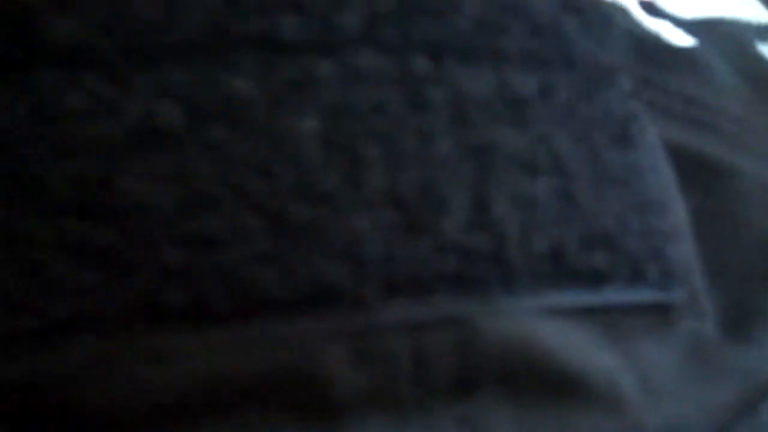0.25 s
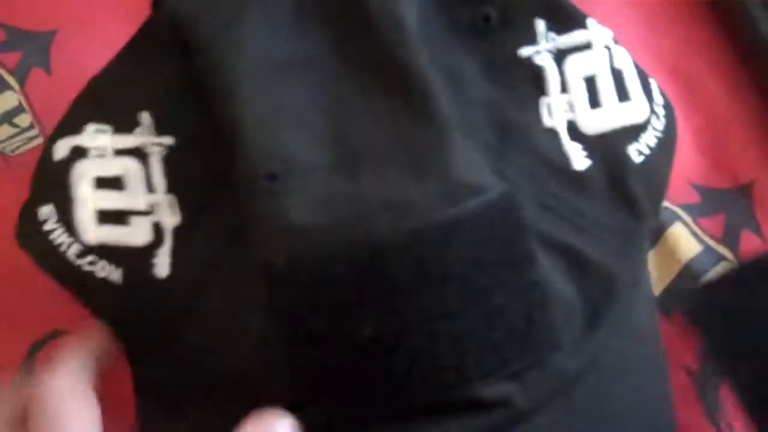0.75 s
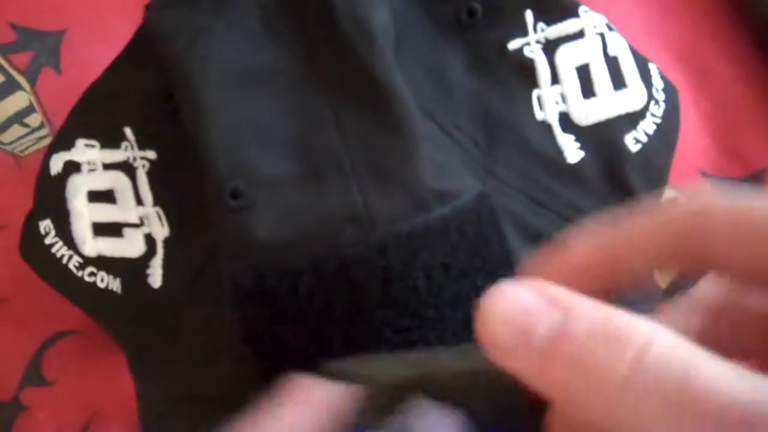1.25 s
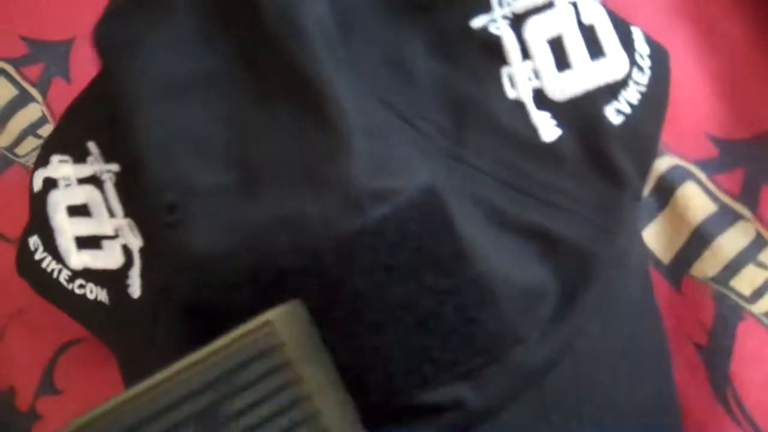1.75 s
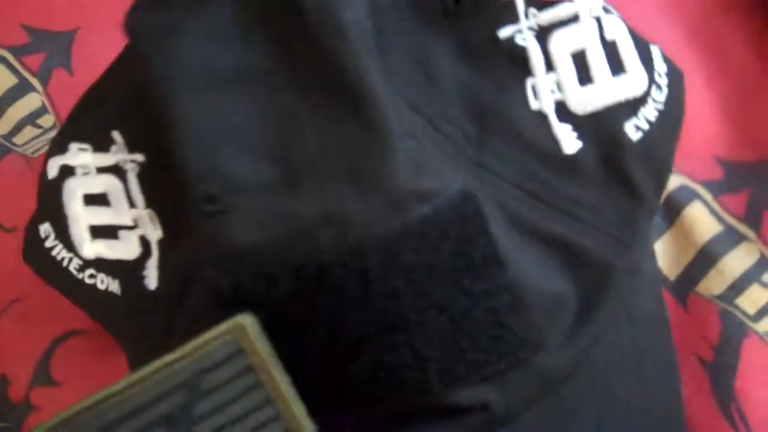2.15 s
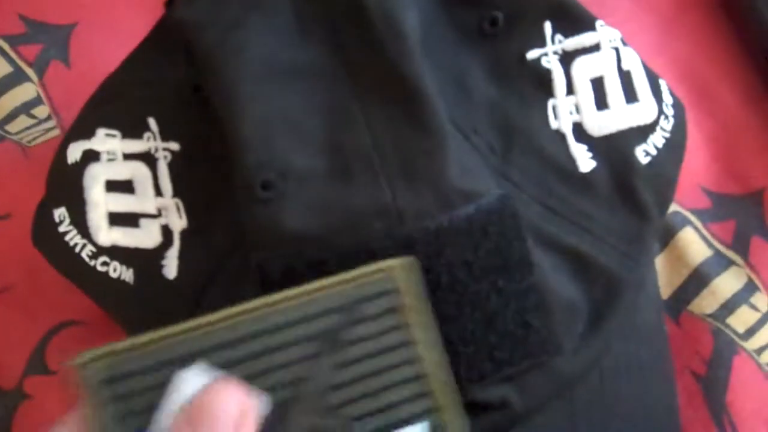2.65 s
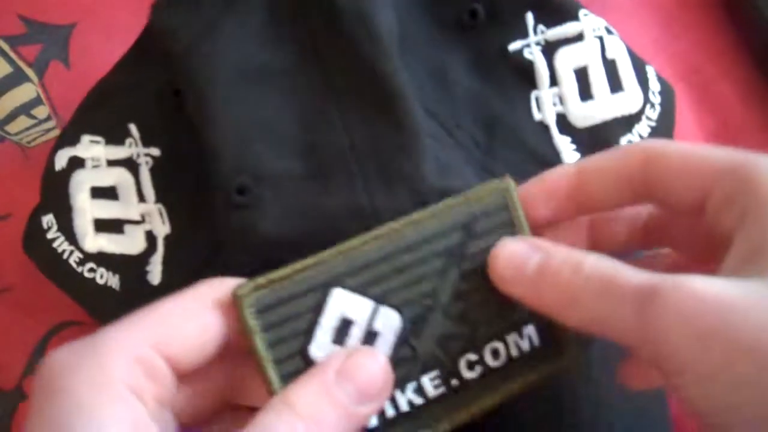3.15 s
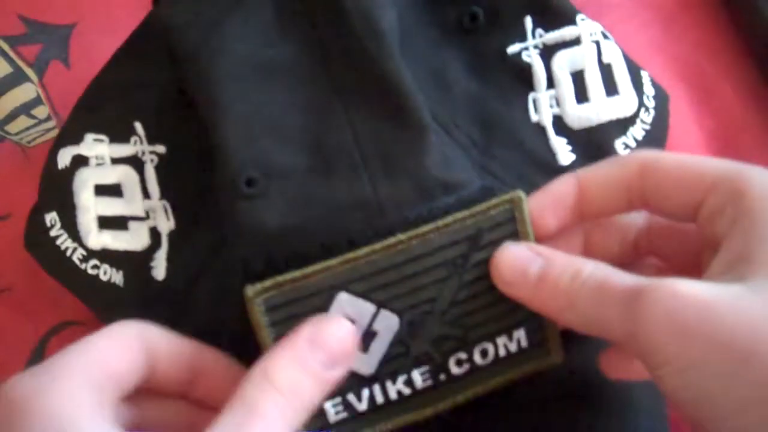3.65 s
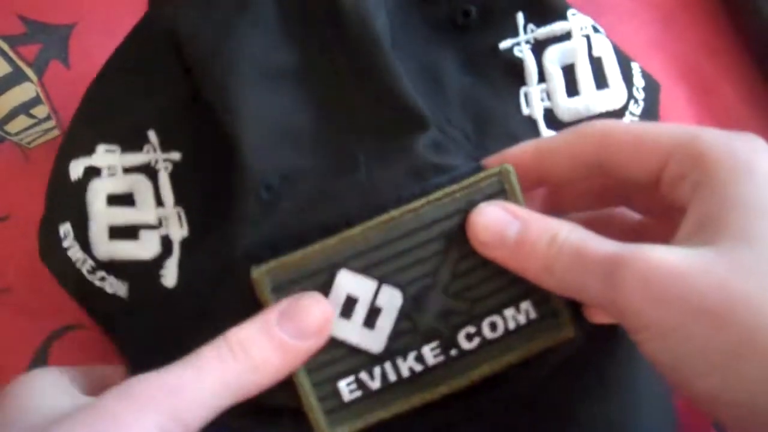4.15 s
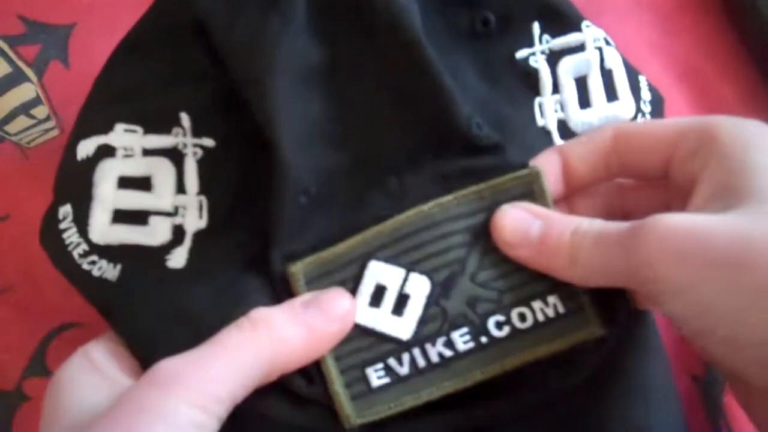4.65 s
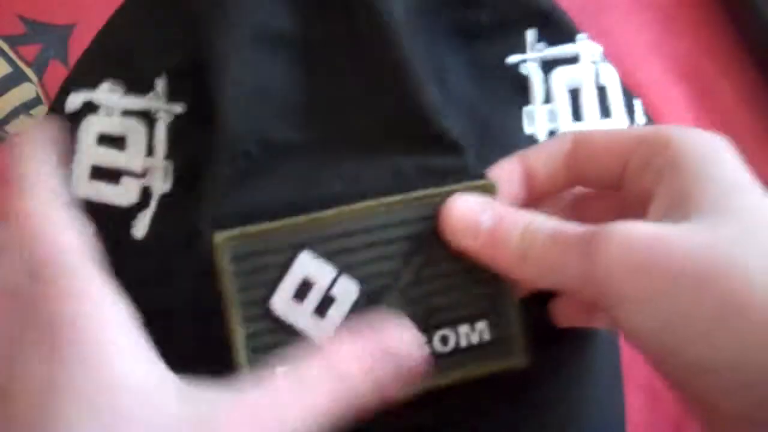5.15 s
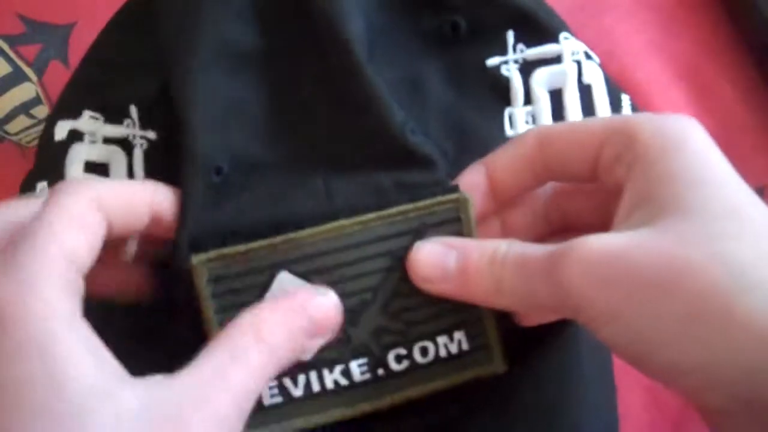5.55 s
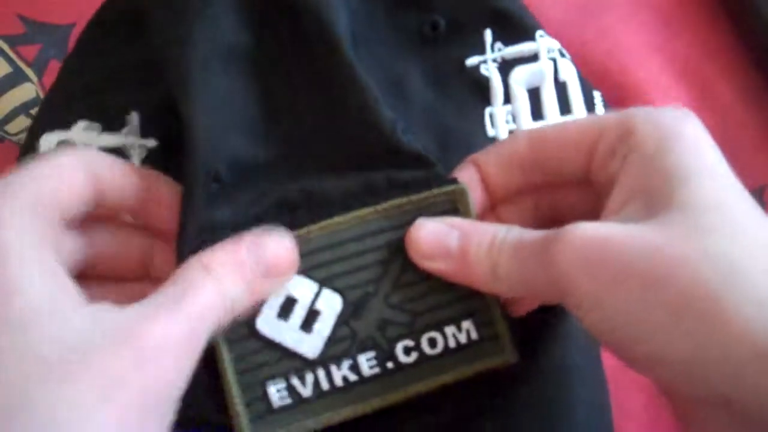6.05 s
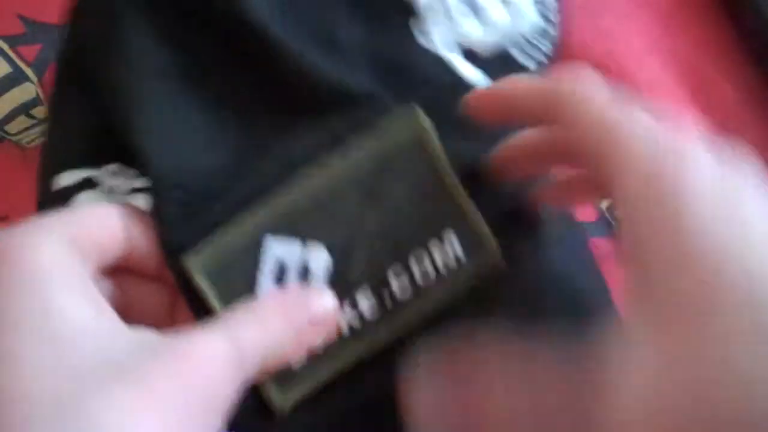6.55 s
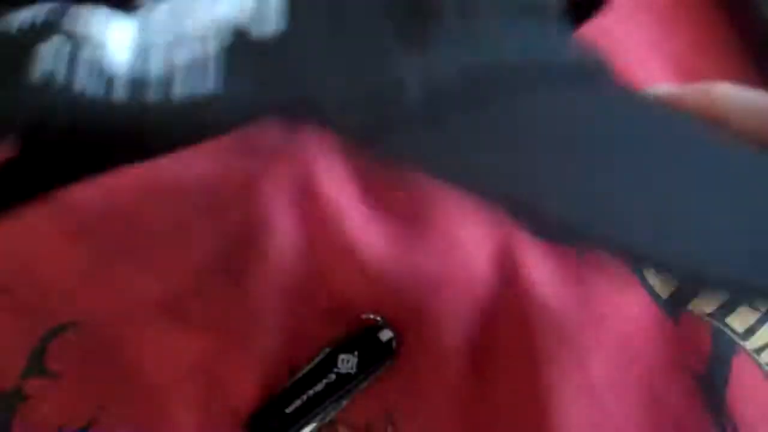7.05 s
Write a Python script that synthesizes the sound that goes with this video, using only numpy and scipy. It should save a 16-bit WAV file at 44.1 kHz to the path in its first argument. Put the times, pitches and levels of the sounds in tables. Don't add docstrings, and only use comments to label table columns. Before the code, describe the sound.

Fingers rub and scuff a fabric cap, a sharp knock early on, then hook-and-loop crackles and snaps thicken as a stiff patch is pressed on.

```python
import sys
import numpy as np
from scipy import signal
from scipy.fft import rfft, irfft, next_fast_len
from scipy.io import wavfile
from scipy.ndimage import uniform_filter1d, map_coordinates

SR = 44100
rng = np.random.default_rng(int(sys.argv[2]) if len(sys.argv) > 2 else 0)


def file_out(sig):
    cols = np.atleast_2d(sig).T
    lim = np.clip(cols, -1, 1)
    pcm = np.round(lim * 32767).astype(np.int16)
    wavfile.write(sys.argv[1], SR, pcm)


def amplitude_ratio(level_db):
    exponent = np.asarray(level_db, float) / 20
    return 10 ** exponent


N = 321533

# f/Hz, level/dB
ROOM_COLOUR = [(20, 5), (60, -2.5), (250, -3.5), (1000, -6), (3000, -7), (6000, -15), (14000, -46)]
# f/Hz, level/dB
HISS_COLOUR = [(100, 9.5), (1000, 6), (5000, 3.5), (14000, 22.5)]
# f/Hz, width/Hz
PORTS = [(7572, 1128), (6300, 954)]
# f/Hz, level/dB
HOUSING = [
    [(100, 1.26), (1000, 2.5), (5000, -3), (9000, -6.5), (14000, -10.5)],
    [(100, -1.5), (1000, 0.35), (5000, -6), (9000, -10.5), (14000, -22)],
]
TOP_HZ, CLICK_TOP_HZ = 14200, 15900

# t/s, level/dB, speed/0-1
SLEEVE = [
    (.15, -81, 0),
    (.25, -56, .4),
    (.34, -53, 0.72),
    (.44, -46.5, 0.75),
    (.5, -61.5, 0.16),
    (.535, -46, 0.04),
    (.6, -80.5, 0.12),
]
# t/s, length/s, level/dB, body re bright/dB
DRAGS = [(0.657, 0.017, -44.5, -3), (0.7, 0.0125, -39.5, -4), (0.743, 0.007, -50, -20),
         (0.796, 0.058, -47, -4), (1.141, 0.05, -71, 4), (1.195, 0.018, -51, -20), (1.214, 0.008, -45, -30),
         (1.294, 0.008, -39, -12), (1.342, 0.039, -52, -25), (1.402, 0.075, -56, -22),
         (1.477, 0.038, -59, -15), (1.537, 0.037, -47.5, -28), (1.574, 0.014, -55, -20),
         (1.613, 0.0054, -45, -25), (1.617, 0.0075, -38.5, -22), (2.254, 0.003, -56, -25),
         (2.264, 0.006, -52, -12), (2.558, 0.028, -52.5, -20), (2.558, 0.15, -60, -11),
         (2.708, 0.006, -52, -15), (3.052, 0.009, -47, -9), (3.229, 0.024, -53.5, 5),
         (3.249, 0.019, -48, 0), (6.632, 0.012, -45, -10), (6.909, 0.031, -50.5, 1), (7.133, 0.03, -52, -8)]
# t/s, peak level/dB, f/Hz, decay/cycles
THUMPS = [(0.688, -44, 57.7, 11), (0.728, -42.5, 45.8, 7.2), (0.928, -61.5, 59.2, 8.8),
          (1.199, -66, 53.8, 5.5), (1.893, -37, 98, 3.09), (2.019, -63, 70.9, 5.2), (2.262, -54, 63, 11),
          (2.72, -63, 80.7, 4.3), (4.099, -72, 64.6, 5.8), (0.627, -60, 113, 9.8), (4.237, -66, 125, 7.7),
          (4.291, -61, 111, 7.8), (5.33, -61.5, 95, 6.1), (6.306, -55, 84, 3.06),
          (5.441, -63.5, 110.5, 4.1), (6.959, -53.5, 68.4, 6.1), (7.098, -63.5, 65, 7.8)]
# t/s, peak level/dB,
# f/Hz, half-width/cycles
POPS = [(0.177, -50.5, 500, 0.4), (1.298, -40.5, 1960, 3.2), (1.621, -36.5, 6300, 4.4),
        (3.056, -43, 1100, 0.82), (3.262, -39.5, 3600, 3.6), (0.6604, -30.5, 447, 0.36),
        (0.665, -33, 613, 0.34), (0.701, -31.5, 450, 0.48), (0.708, -32, 199, 0.39),
        (.731, -34.5, 310, 0.49), (0.737, -32.5, 250, 0.33), (0.8723, -22, 787, 0.377),
        (0.8726, -16.5, 5150, 1.57), (0.8728, -25, 2770, 2.46), (1.8931, -41.5, 3340, 3.9),
        (1.8947, -33.5, 5450, 4.1), (2.2627, -45, 3140, 2.5), (2.2628, -39, 1905, 1.49),
        (5.304, -32, 4800, 1.57), (5.2488, -42, 3700, 2), (6.5828, -35.5, 5560, 1.47),
        (1.894, -42, 250, 0.3), (1.892, -35, 1900, 1.15), (2.2632, -39.5, 1178, 1.35),
        (2.723, -50, 500, 0.8), (3.077, -39, 287, 0.414), (3.831, -51, 395, 1.2), (3.912, -41.5, 473, 0.41),
        (3.947, -43.5, 328, 0.93), (4.08, -38, 1480, 1.77), (4.409, -35, 313, 0.677),
        (4.609, -53.5, 150, 0.92), (5.351, -59, 450, 0.59), (5.465, -50, 510, 0.45),
        (5.848, -22, 461, 0.618), (6.222, -39.5, 317, 0.79), (6.321, -40, 550, 0.36),
        (6.8265, -30.5, 672, 0.61), (6.915, -28, 494, 0.37)]

# f/Hz, level/dB
CRACK_COLOUR = [(400, -55), (1500, -58.5), (3000, -0.5), (5200, -5), (6300, 2.5), (8000, 0), (10000, -3.5),
                (14500, 8)]
# f/Hz, level/dB
BODY_COLOUR = [(80, -66), (300, -16.5), (700, -12), (1500, -5), (2500, -2.5), (4500, -13.5)]
# t/s, peak level/dB, body re crack/dB, left minus right/dB
EDGE_FLICKS = [(0.1774, -32.5, -6.5, 23), (.5198, -47, -2.5, 23), (0.7039, -18.5, -2, 11.5),
               (0.7368, -25.5, 4, 5), (.871, -23, -10.5, 9.5), (0.872, -4, -18.5, -11.5),
               (.8725, -20.5, -12.5, -4), (.8733, -22, -3.5, -5), (1.275, -28, -15.5, 13.5),
               (1.8914, -42.5, -22, 0), (1.8921, -17, -11, -22), (1.893, -18.5, -14, 10.5),
               (1.8948, -29.5, -8, 0), (2.262, -25.5, -10.5, 2.5), (2.7196, -33, 4, -8),
               (3.47, -38.5, -14.5, 3), (3.511, -26, -3, -18.5), (4.244, -19.5, -11, 5.5),
               (4.2851, -20, -9.5, -1.5), (4.5555, -28.5, -5, 14), (4.931, -27.5, -17, 4.5),
               (5.465, -27.5, -9.5, 15), (4.854, -29.5, -12.5, 6.5), (4.869, -26.5, -4, 2.5),
               (5.01, -18.5, -11.5, -7), (5.846, -20.5, -2.5, 12), (6.097, -35.5, -8, 13.5),
               (6.6172, -24.5, -4.5, -2), (6.7886, -29, -11.5, 1), (6.8264, -29.5, 3.5, 2.5),
               (7.0388, -28.5, 1, 4), (7.1355, -38, 3, 3.5)]
# t/s, peak level/dB, body re crack/dB, left minus right/dB
HANDLING_TICKS = [(0.0347, -31.5, -22, 6.5), (0.0732, -30.5, -27, 11), (0.5527, -30, -11.5, 8),
                  (0.7063, -27, -9.0, 3), (0.7403, -21.5, -19.5, 7), (0.9341, -33.5, -12.5, 4.5),
                  (1.0405, -36, -28, 9), (1.1961, -27, -21, 2.5), (1.215, -27, -33, 6),
                  (1.2182, -30, -32.5, 21.5), (1.442, -35.5, -22, 15.0), (1.4969, -37, -3.5, -2.5),
                  (1.895, -31, -7, -7), (2.185, -38.5, -21.5, -3), (3.2588, -25, -8.5, -10.5),
                  (3.2622, -27.5, -0.5, -9), (3.4942, -36.5, -12.5, 6.0), (3.5311, -24, -11, -15.5),
                  (3.65, -27.5, -25.5, 10), (3.8512, -30, -10.5, -8), (3.822, -30.5, -14.5, 2.5),
                  (4.1684, -30.5, -9.5, 5.5), (4.3273, -28, -9.5, 7), (4.5686, -25, -14, 3),
                  (4.6018, -21.5, -14, -5), (4.614, -27.5, -13, -3.5), (4.6361, -23, -12.5, 7),
                  (4.649, -20, -13, 3), (4.6648, -21, -23.5, 15), (4.7133, -22, -23.5, 3.5),
                  (4.7257, -23, -12.5, 1.5), (4.7389, -32.5, -15, 0.5), (4.7489, -24.0, -8, 6.5),
                  (4.799, -20, -14.5, 1.0), (4.8027, -31.5, -20, -0.0), (4.812, -24.5, -15.5, -0.5),
                  (4.8613, -29.5, -18.5, 16), (4.884, -28.5, -13, -6.0), (4.8965, -26, -19, -1.0),
                  (4.9449, -27.5, -22.5, 3.5), (4.9771, -23, -11.5, 2.5), (4.9942, -18.5, -11.5, 0.5),
                  (5.0019, -18.5, -6, -5.5), (5.0909, -14.5, -17.5, 11.5), (5.1144, -30, -19.5, 7.5),
                  (5.1292, -31.5, -20, 9), (5.1914, -10, -20.5, 0.5), (5.202, -21.5, -9, 2.5),
                  (5.2484, -18, -27, 9.5), (5.2575, -26.5, -14.5, -0.5), (5.2612, -35.5, -15, 10.0)]
# t/s, peak level/dB, body re crack/dB, left minus right/dB
PRESSING_RIPS = [(5.2749, -24.5, -13.5, 4.5), (5.3029, -15, -18, 9), (5.4686, -31.5, -1, 6.5),
                 (5.6481, -29.5, -20.5, -8.5), (5.6995, -25, -26, 8.5), (5.7722, -31, -11.5, -5.5),
                 (5.8236, -20.5, -20.5, 1.5), (5.8516, -20.5, -2.5, 5.0), (5.8952, -17.5, -29, 11),
                 (5.9122, -17.5, -26.5, -0.5), (5.9408, -29.5, -18.5, 3.0), (5.9471, -19.5, -19.5, -3.5),
                 (5.9502, -37.5, -18.5, 11.0), (5.968, -30, -17, 1.5), (5.9805, -26.5, -15.5, 14),
                 (5.9959, -36.5, -12.5, 4), (6.025, -40.5, -4.5, 9), (6.0285, -31.5, -6.5, 6),
                 (6.1451, -21, -15.5, 2.5), (6.1495, -13, -24.5, 7), (6.1659, -21.5, -11, 1.5),
                 (6.1894, -29, 2.5, 0), (6.2103, -31.5, -3, 10.5), (6.2434, -25, -23, 4.5),
                 (6.3419, -19, -13, 6), (6.35, -18.5, -22.5, -4.5), (6.3565, -15, -21, 9),
                 (6.3785, -34.5, -24, 4.0), (6.3955, -19.5, -21.5, 4.0), (6.4, -20.5, -31.5, 7),
                 (6.4037, -17, -15, 3), (6.4395, -26, -13.5, 10), (6.4775, -26, -19, 12),
                 (6.486, -26, -18, 3.5), (6.4995, -26, -19.5, 15), (6.5269, -27, -14, -1.0),
                 (6.5682, -29, -19.5, 1.5), (6.5825, -14, -9.5, -6), (6.5907, -26.5, -4, 4),
                 (6.6605, -24.5, -10.5, -4.5), (6.6661, -24, -10, 5.5), (6.7987, -23.5, -3.5, 2.5),
                 (6.8119, -32.5, -12.5, 3.0), (6.8168, -18.5, -8.5, 6.5), (6.9039, -23.5, -18.5, -4),
                 (5.907, -29, -14.5, 4), (5.959, -27, -18, 4), (6.015, -36, -10.5, 4),
                 (6.038, -37.5, -2.5, 2)]

# f/Hz, level/dB
HOOK_COLOUR = [(3000, -23.5), (4900, -10), (5600, -10), (6300, -6), (7000, -5.5), (9000, -7.5),
               (11000, -7.5)]
# f/Hz, level/dB
PATCH_COLOUR = [(700, -30), (1500, -7.5), (2500, -4.5), (3700, 0.5), (4800, -9), (6500, -14.5)]
# f/Hz, level/dB
CLOTH_COLOUR = [(60, -35), (110, -8.5), (200, -7), (500, -1.5), (1500, -1), (2800, -10.5)]
# f/Hz, level/dB
FUZZ_COLOUR = [(7000, -38), (9000, -9.5), (10500, -6), (12000, -1.5), (14500, 5)]
# t/s, crackle share/0-1
GRIP = [(0, 0.34), (.6, 0.06), (.7, 0.32), (1.2, 0.11), (2.5, 0.03), (3.4, 0.11), (3.5, 0.42), (4.2, 0.09),
        (4.6, 0.44), (5.3, 0.32), (5.6, 0.14), (5.9, 0.57), (6.4, 0.37), (6.8, 0.23), (7.29, 0.04)]
IDLE_DB = [-71, -83, -76, -71.5]
# hold from t/s,
# hold/s, hooks level/dB, patch re hooks/dB, cloth re hooks/dB
HAND_STROKES = [(0.036, 0.128, -62, -16, -24), (0.187, 0.077, -60, -5, -3), (0.291, 0.204, -55, -5, -12.5),
                (0.531, 0.036, -54.5, -2.5, -8), (0.627, 0.0102, -47, -9.5, -20.5),
                (0.649, 0.0166, -42.5, -10.5, -9.5), (0.697, 0.0124, -49, 1.5, 7),
                (0.733, 0.0156, -48.5, 2, 0.5), (0.776, 0.011, -50, -1.5, -2), (0.807, 0.0148, -45, -3, -2),
                (0.877, 0.0049, -57.5, 1.5, 8.5), (0.918, 0.079, -62, -9, -29.5),
                (1.158, 0.0252, -55.5, -11, -2), (1.219, 0.0082, -45.5, -16.5, -33),
                (1.273, 0.012, -47, -10, -33), (1.297, 0.01, -49, -4, -33), (1.353, 0.0041, -52, -9, -28.5),
                (1.431, 0.03, -59.5, -2.5, -30.0), (1.551, 0.0026, -52.5, 1.5, -27.5),
                (1.63, 0.0041, -52.5, -6.5, -23.5), (1.725, 0.052, -52, -6, -15.5),
                (1.9, 0.0032, -55, -14.5, 0), (2.265, 0.1, -58, -7.5, -7), (2.416, 0.098, -67, -2, 3.5),
                (2.575, 0.0052, -54.5, -6, -27), (2.606, 0.103, -55, -1, -21.5),
           (2.725, 0.104, -49.5, -5.5, -17), (3.013, 0.0524, -49, -7, -13.5), (3.09, 0.0274, -49.5, -7, -7),
           (3.15, 0.049, -50.5, -3, -0.5), (3.235, 0.0077, -50, 2.5, 4), (3.29, 0.0216, -54, -9.5, -11),
           (3.355, 0.128, -45, -7, -8), (3.514, 0.0174, -50, -1.5, -4.5),
           (3.603, 0.073, -55.5, -8.5, -11.5), (3.709, 0.0546, -50.5, -5.5, -10.5),
           (3.831, 0.0198, -51.5, 0.5, -4), (3.921, 0.0865, -48.5, -5.5, -2),
           (4.077, 0.053, -49.5, 1, -2.5), (4.213, 0.0843, -46, -0.45, -2.5), (4.33, 0.034, -50, -2, -7),
           (4.388, 0.0402, -49.5, 1, 3.5), (4.452, 0.006, -51, 2, -2.5), (4.474, 0.0067, -46.5, -4.5, -2),
           (4.51, 0.019, -50, -2, -4), (4.59, 0.071, -45.5, 0.42, -10), (4.66, 0.044, -45.5, -1, -15.5),
           (4.738, 0.111, -41.5, -1.5, -16.5),
                (4.94, 0.068, -46, -3.5, -10.5), (5.009, 0.085, -44.5, -1, -6), (5.122, 0.067, -40, -7, -11.0),
            (5.218, 0.0093, -48, 1.5, -3.5), (5.29, .008, -67, -5, -8.5), (5.323, 0.0598, -49.5, -2, 1),
            (5.4, 0.0732, -49, -2.17, -4.5), (5.476, 0.105, -53.5, -0.5, -3.5),
            (5.582, 0.0232, -46, -3, -5.5), (5.687, 0.0525, -45.5, -4.5, -7.5),
            (5.808, 0.0827, -45, -2.5, -6.5), (5.889, 0.098, -45.5, -3, -17), (6.108, 0.087, -48, 1.5, -13),
            (6.154, 0.0624, -45.5, -2.5, -1), (6.306, 0.075, -37.5, -2, -11), (6.458, 0.089, -51, -4.5, -9),
            (6.57, 0.0178, -42, -2, -7.5), (6.615, 0.031, -43.5, -1.5, -5.5), (6.68, 0.116, -49, -3, -6),
            (6.798, 0.048, -42, -5, -6), (6.875, 0.0152, -43, -8, -17), (6.898, 0.024, -39, -5.5, -1),
            (6.95, 0.0142, -48.5, -9, -2.5), (6.965, 0.157, -55.5, -3.5, -4),
            (7.144, 0.0305, -47, -6.5, -6), (7.277, 0.22, -45, -2.5, -10)]


def unit(x):
    return x / np.sqrt(np.mean(x ** 2) + 1e-20)


def along(points, hz):
    f, v = np.transpose(points)
    return np.interp(np.log(hz + 1), np.log(f + 1), v)


def filtered(x, response):
    m = next_fast_len(N + 8192)
    return irfft(rfft(x, m) * response(np.fft.rfftfreq(m, 1 / SR)), m)[..., :N]


def coloured(x, spectrum, top_hz=TOP_HZ):
    return filtered(x, lambda hz: unit(amplitude_ratio(along(spectrum, hz)) * (hz < top_hz)))


def wobble(rate):
    knots = rng.standard_normal(int(N * rate / SR) + 4)
    return map_coordinates(knots, [np.arange(N) * rate / SR])


def pair(alike, patchy_db=2.5):
    z = signal.stft(rng.standard_normal((2, N)), nperseg=512)[2]
    field = uniform_filter1d(rng.standard_normal(z.shape[1:]), size=5, axis=0)
    field = uniform_filter1d(field, size=3, axis=1)
    a, b = unit(signal.istft(z * amplitude_ratio(patchy_db * unit(field)), nperseg=512)[1][:, :N])
    turn = np.arccos(np.clip(alike, 0, 1)) / 2
    return np.cos(turn) * a + np.sin(turn) * np.array([b, -b])


def room_tone():
    return amplitude_ratio(-62 + 1.59 * wobble(3.852)) * coloured(pair(0.013), ROOM_COLOUR)


def far_appliance():
    return amplitude_ratio(-78.0) * unit(filtered(pair(0.66), lambda hz: np.exp(-((hz - 230) / 30) ** 2)))


def sleeve_swish():
    s, level_db, speed = np.transpose(SLEEVE)
    time, weave = np.arange(N) / SR, pair(0.53)
    rise = np.clip(np.interp(time, s, speed), 0, 1)

    def band(hz):
        return unit(filtered(weave, lambda f: np.exp(-((f - hz) / 1100) ** 2)))

    gain = amplitude_ratio(np.interp(time, s, level_db, left=-120, right=-120) + 1.45 * wobble(45.26))
    slow, fast = np.sqrt(1 - rise) * band(hz=8360), 1.99 * np.sqrt(rise) * band(hz=10170)
    return gain * (slow + fast)


def scuffs():
    time, bright, dull = np.arange(N) / SR, np.zeros(N), np.zeros(N)
    for s, length, db, body_db in DRAGS:
        drag = np.clip(np.minimum(time - s, s + length - time) / 0.0008, 0, 1)
        bright += amplitude_ratio(db + 1) * drag
        dull += amplitude_ratio(db + body_db) * drag
    rough = amplitude_ratio(2.63 * wobble(600))
    return coloured(bright * rough * pair(0.77), HOOK_COLOUR) + coloured(dull * rough * pair(0.96), BODY_COLOUR)


def table_thumps():
    out, t = np.zeros((2, N)), np.arange(SR // 4) / SR
    for s, db, hz, cycles in THUMPS:
        turn = max(hz, 60) * t
        swing = np.sin(2 * np.pi * turn) * (1 - np.exp(-turn / 0.353))
        side = amplitude_ratio(rng.normal(-1, 3) * np.array([[1], [-1]]))
        ring = amplitude_ratio(db + 9.5 - 60 * turn / np.clip(cycles, 1.2, 9)) * side * swing
        span = out[:, round(s * SR):][:, :len(t)]
        span += ring[:, :span.shape[1]]
    return out


def pops_and_rings():
    out, t = np.zeros((2, N + SR)), np.arange(SR // 4) / SR
    lead = 1 / 40
    for s, db, hz, cycles in POPS:
        turn = hz * (t - lead)
        swing = -np.cos(2 * np.pi * turn) * np.exp(-(turn / np.clip(cycles, .4, 4)) ** 2)
        out[:, round((s - lead) * SR):][:, :len(t)] += amplitude_ratio(db) * swing
    return filtered(out, lambda f: f * f / (f * f + 110 ** 2))


def snaps():
    crack, body = np.zeros((2, N + SR)), np.zeros((2, N + SR))
    t = np.arange(SR // 25) / SR
    dying = amplitude_ratio(-60 * t / 0.00409) * (1 - np.exp(-t / 0.000364))
    tail = amplitude_ratio(-38.0 - 60 * t / 0.0247)
    step = 1. * (np.arange(len(t)) == 12)
    edges, hooks = (EDGE_FLICKS, .45), (list(HANDLING_TICKS) + list(PRESSING_RIPS), .9)
    for rows, rattle in (edges, hooks):
        for s, db, body_db, pan_db in rows:
            a, b, c = (rattle * dying + tail) * rng.standard_normal((3, len(t)))
            side = amplitude_ratio(np.array([[.3], [-.3]]) * pan_db) / np.linalg.norm(step + a)
            k = round(s * SR)
            crack[:, k:k + len(t)] += amplitude_ratio(db + 7) * side * (step + a + .5 * np.array([b, -b]))
            body[:, k:k + len(t)] += amplitude_ratio(db + body_db + 9.5) * (step + c) / np.linalg.norm(step + c)
    return coloured(crack[:, :N], CRACK_COLOUR, CLICK_TOP_HZ) + coloured(body[:, :N], BODY_COLOUR)


def catches(rate, spread_db, t60):
    chance, size = rng.random(N), rng.exponential(size=N)
    spikes = (chance < rate / SR) * amplitude_ratio(np.minimum(spread_db * size, 10))
    train = signal.fftconvolve(spikes, amplitude_ratio(-60 * np.arange(SR // 20) / SR / t60))[:N]
    recent = np.abs(uniform_filter1d(unit(train) ** 2, size=1800) + .15)
    return unit(train / recent ** .4)


def strokes():
    time = np.arange(0, N / SR + .002, .002)
    power = amplitude_ratio(2 * np.array(IDLE_DB))[:, None]
    for s, hold, db, patch_db, cloth_db in HAND_STROKES:
        early = (s - time) / (0.0253 + 0.614 * hold)
        late = (time - s - hold) / (0.058 + 0.373 * hold)
        fuzz_db = -18 - 0.616 * max(cloth_db, -12.5)
        share_db = np.array([0, patch_db, cloth_db, fuzz_db])
        power = power + amplitude_ratio(2 * (db + share_db[:, None] - 20 * np.maximum(early, late).clip(0)))
    return [np.interp(np.arange(N) / SR, time, 10 * np.log10(p)) for p in power]


def hands():
    time = np.arange(N) / SR
    hooks_db, patch_db, cloth_db, fuzz_db = strokes()
    grip = np.clip(np.interp(time, *np.transpose(GRIP)), 0, .95)
    every, fine, coarse = [catches(rate=300, spread_db=6.5, t60=t60) ** 2 for t60 in (.003, .0025, .004)]
    sway = amplitude_ratio(wobble(45))
    tips = sway * np.sqrt(1 - grip + grip * (.75 * every + .55 * fine))
    roots = sway * np.sqrt(1 - grip + grip * (.75 * every + .55 * coarse))
    soft = np.sqrt(uniform_filter1d(roots ** 2, size=120).clip(0))
    folds = amplitude_ratio(1.6 * wobble(50))
    hooks = coloured(amplitude_ratio(hooks_db - 0.5) * tips * pair(0.438), HOOK_COLOUR)
    patch = coloured(amplitude_ratio(patch_db - 1.54) * roots * pair(0.915), PATCH_COLOUR)
    cloth = coloured(amplitude_ratio(cloth_db - 2.0) * folds * soft * pair(0.99), CLOTH_COLOUR)
    fuzz = coloured(amplitude_ratio(fuzz_db + 12) * tips * pair(0.11), FUZZ_COLOUR)
    return hooks + patch + cloth + fuzz


def scene():
    background = room_tone() + far_appliance()
    handling = sleeve_swish() + scuffs() + table_thumps() + pops_and_rings() + snaps()
    return background + handling + hands()


def low_pass(x):
    return signal.sosfilt(signal.butter(12, 15700, fs=SR, output="sos"), x)


def record(dry):
    def port(f, centre, width, shade):
        rumble_cut = f * f / (f * f + 24 ** 2)
        ring = centre * centre / (centre * centre - f * f + 1j * f * width)
        return amplitude_ratio(along(shade, f)) * rumble_cut * ring

    def ports(f):
        return np.array([port(f, centre, width, shade) for (centre, width), shade in zip(PORTS, HOUSING)])

    hiss = amplitude_ratio([[-71], [-74]]) * coloured(pair(.05), HISS_COLOUR)
    wet = filtered(dry, ports) + hiss
    finished = filtered(wet, lambda hz: np.where(hz < TOP_HZ, 1, amplitude_ratio(-18.5)))
    return low_pass(finished)


dry = scene()
out = record(dry)
file_out(out)
```